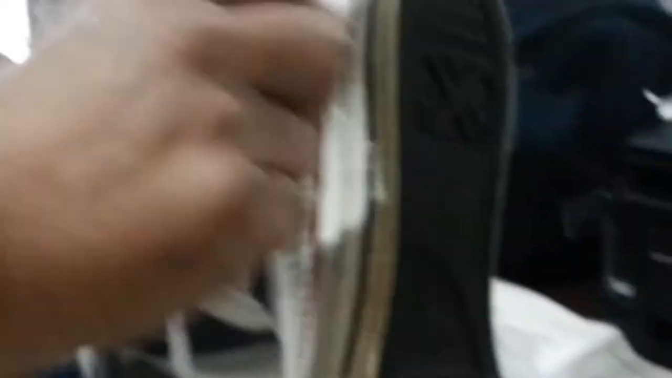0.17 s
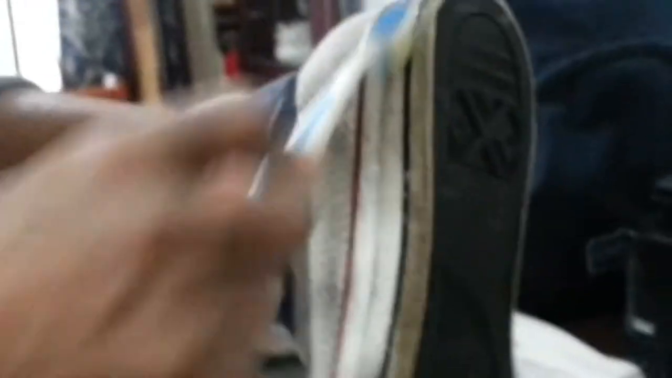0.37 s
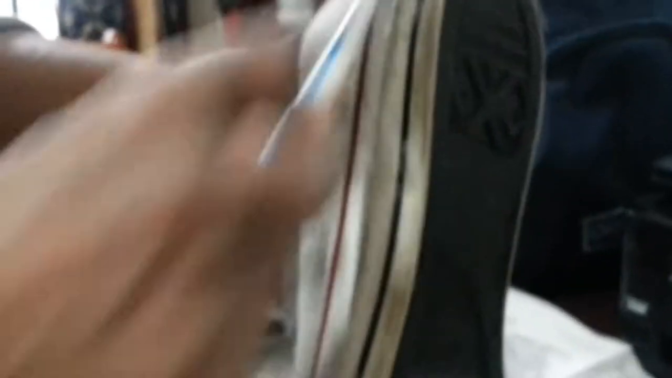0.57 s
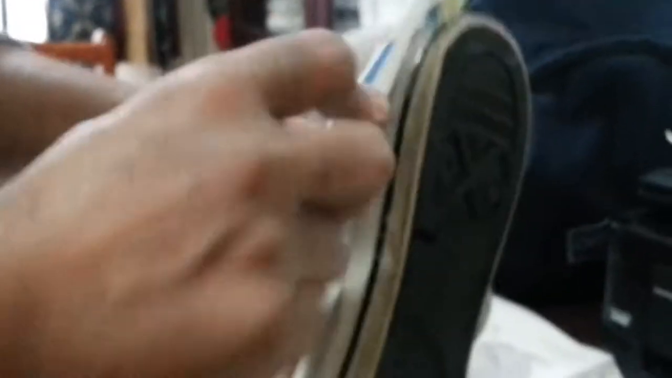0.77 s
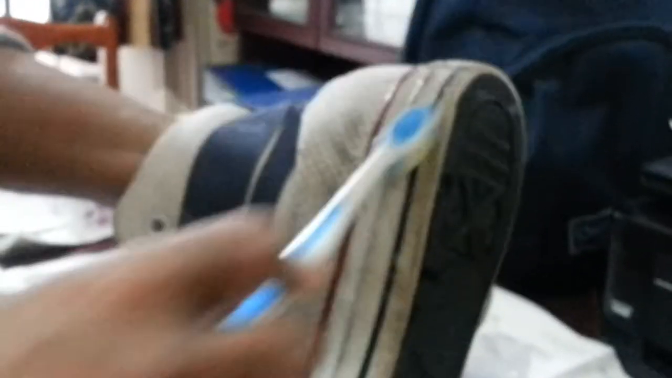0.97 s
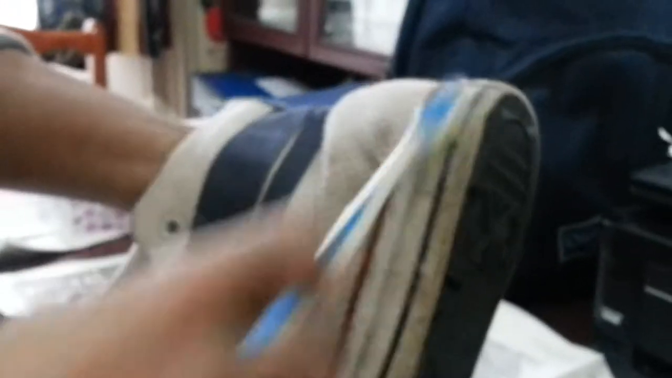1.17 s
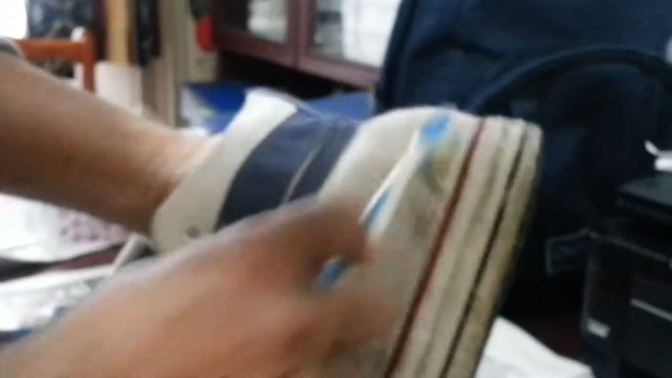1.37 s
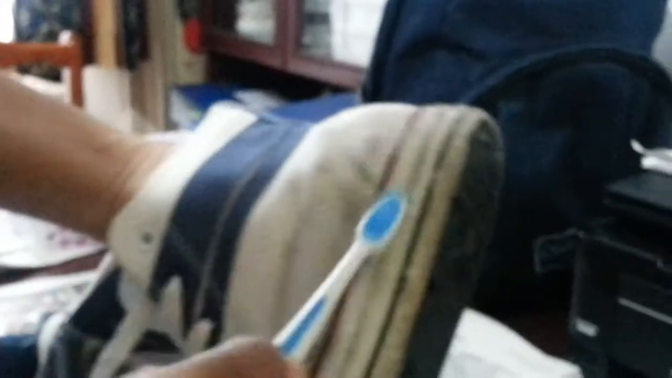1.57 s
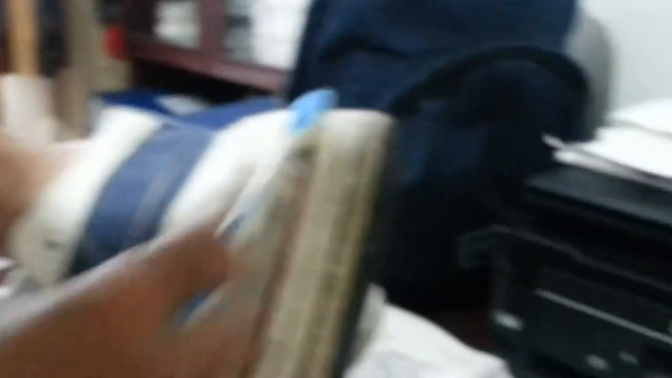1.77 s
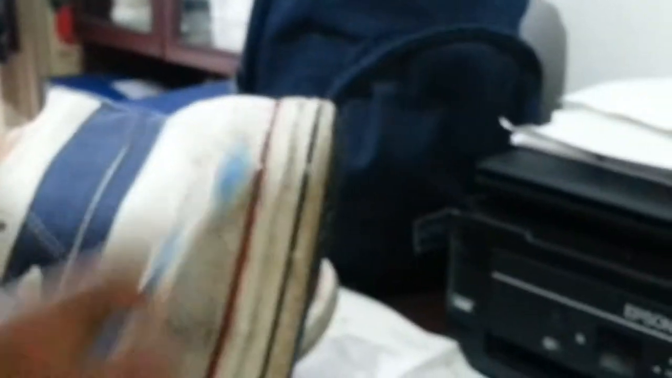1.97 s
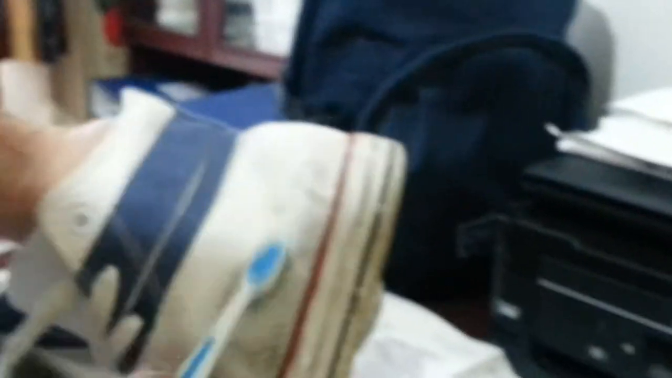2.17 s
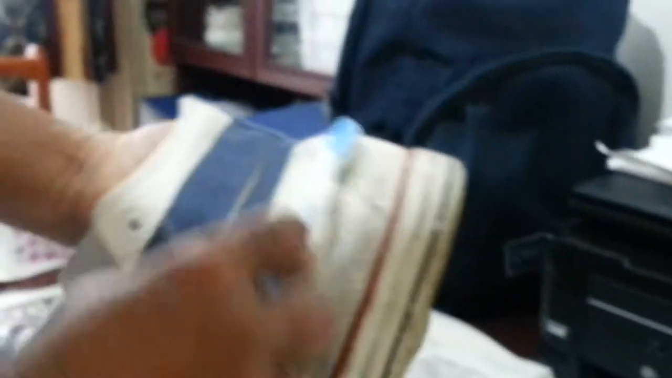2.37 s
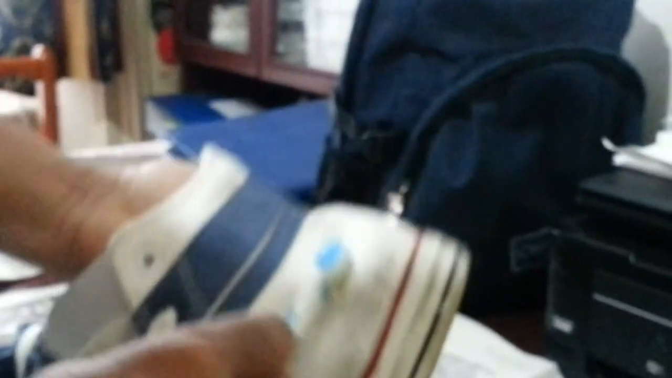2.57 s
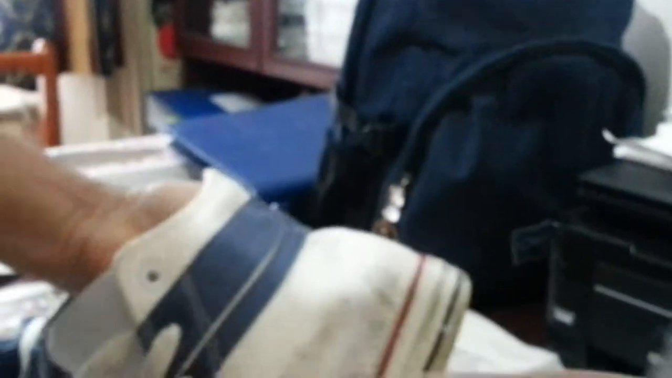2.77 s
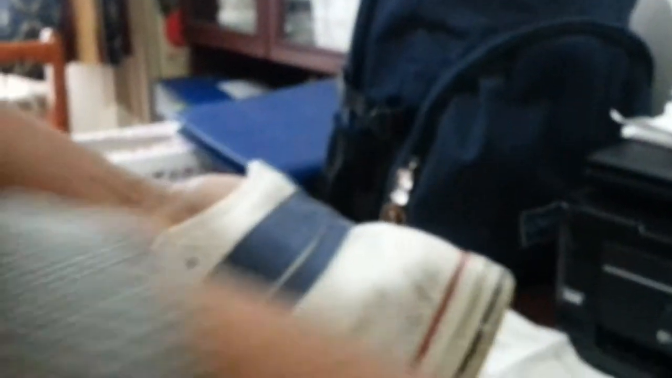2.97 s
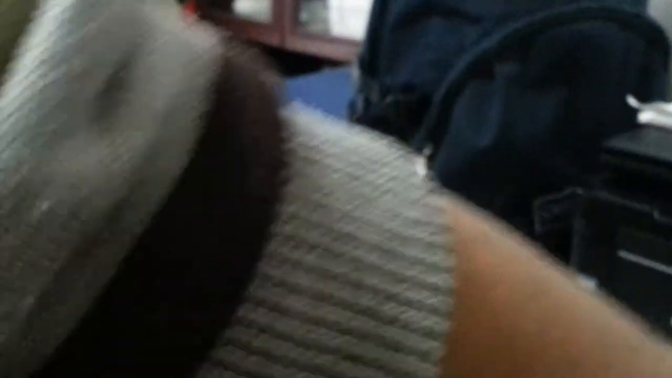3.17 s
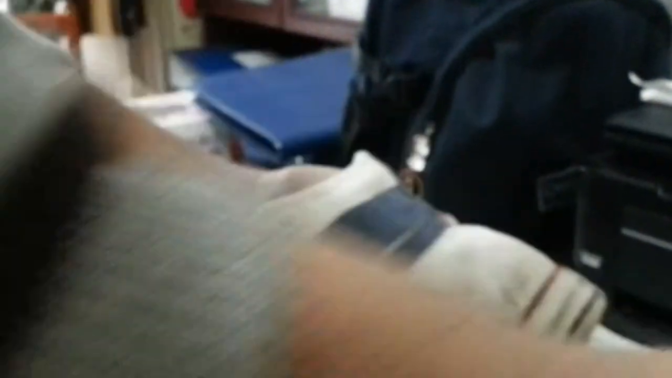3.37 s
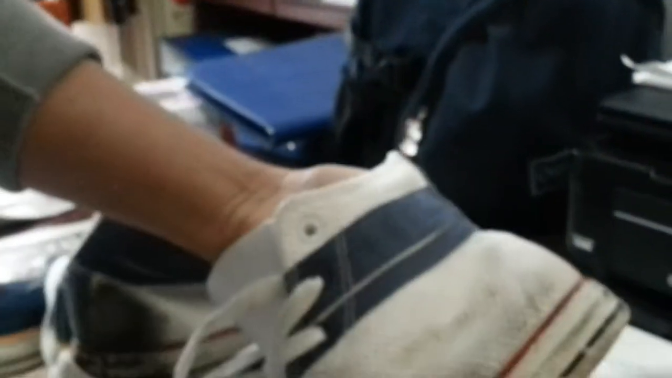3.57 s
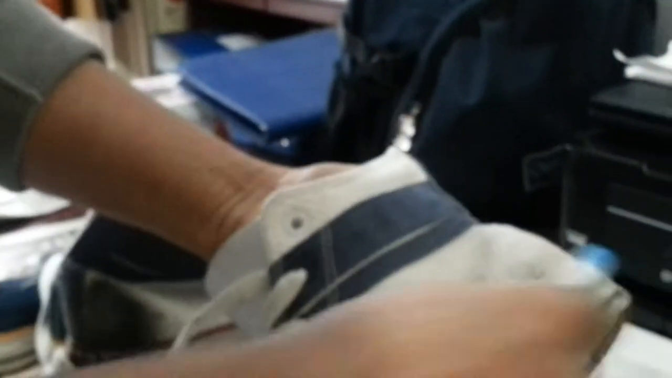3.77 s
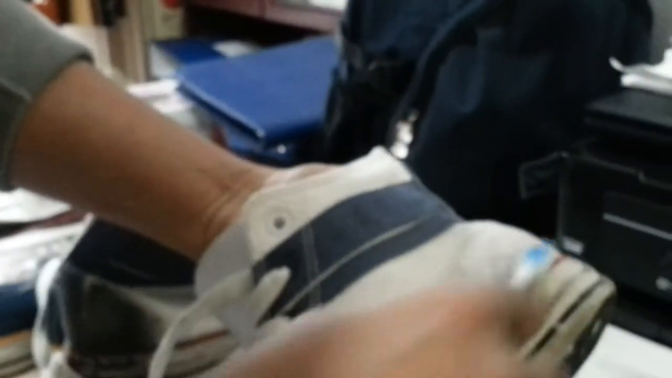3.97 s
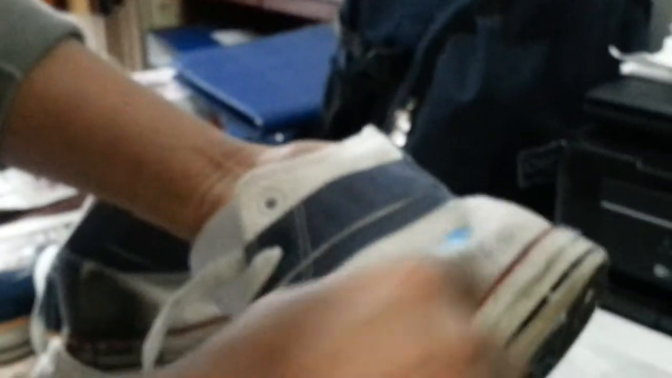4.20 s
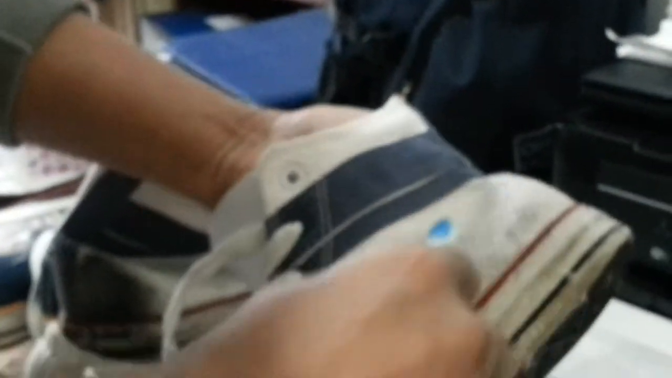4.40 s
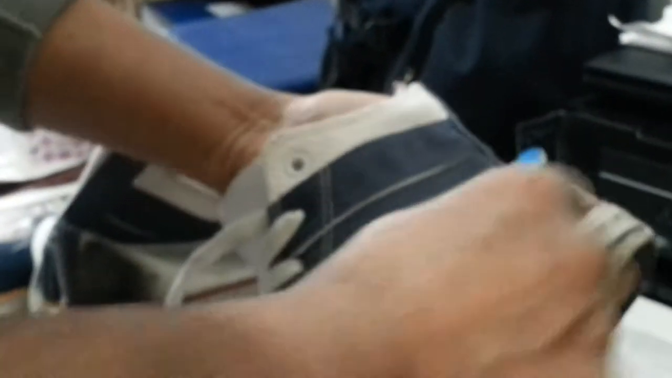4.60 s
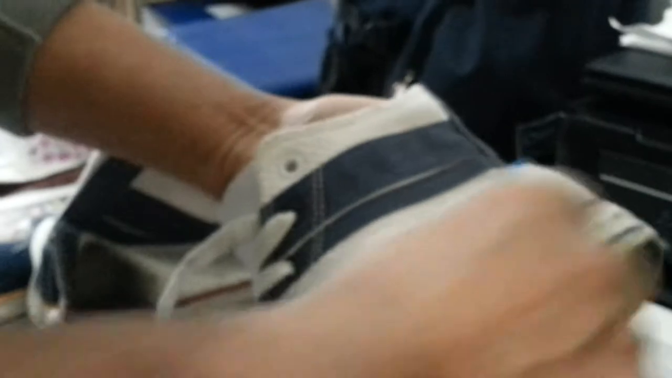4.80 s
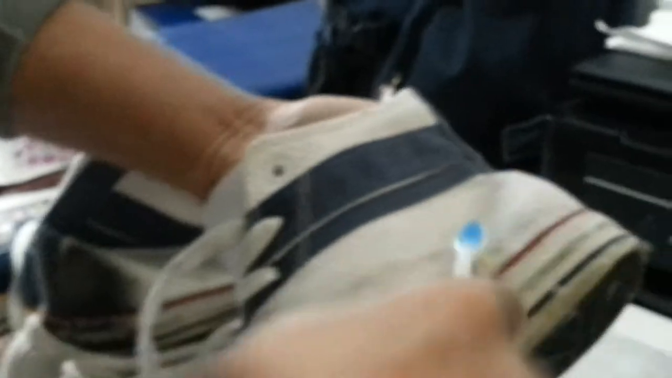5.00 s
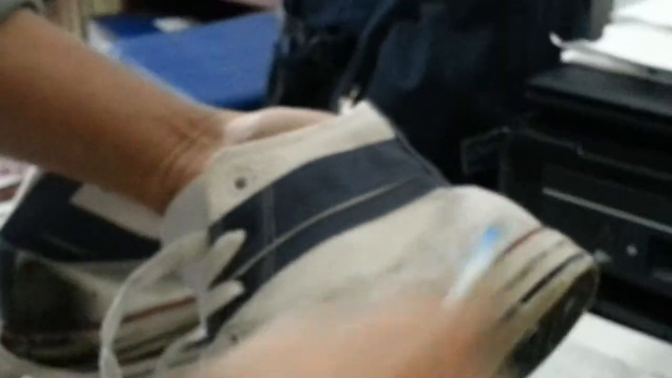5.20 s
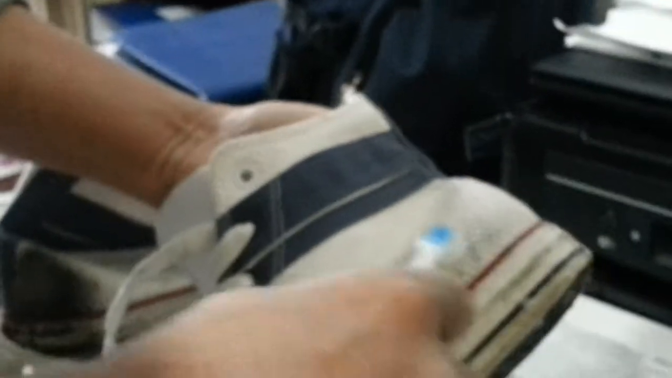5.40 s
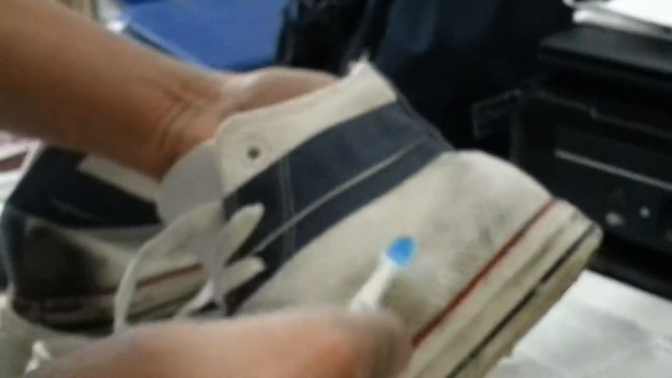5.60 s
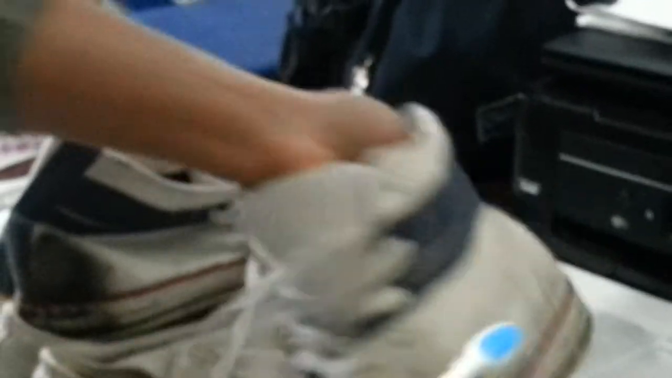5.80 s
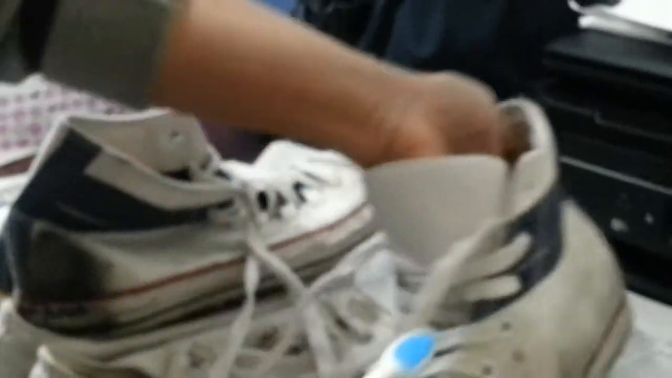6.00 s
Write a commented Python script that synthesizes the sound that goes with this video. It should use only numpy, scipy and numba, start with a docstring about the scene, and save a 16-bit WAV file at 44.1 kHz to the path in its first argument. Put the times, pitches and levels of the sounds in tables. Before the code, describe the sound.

Close stereo phone pickup in a quiet room with faint air, microphone hiss and a short, soft wash from the walls. From 0 seconds a wet toothbrush scrubs a canvas shoe, about six to eight strokes a second, each a swelling bright hiss with foamy fizz; around 0.5 to 1.5 the rubber rim adds a rougher, lower rasp. A dull double table knock comes near 1.0. Strokes peak around 1.5 to 2.2, the loudest near 1.9, with a hollow shoe drone beneath, and stop by 2.7 with a tick and soft knock. From 2.9 to 3.5 cloth rustles, mostly left, with a hard bump and scrape at 3.1 and smaller ones at 3.3. After near quiet, ticks at 3.8 restart brisk, steady scrubbing, with soft thuds at 4.4 and 4.95. A strong stroke falls near 5.3, a sharp click at 5.5, small rattling ticks around 5.7, then weak, rough strokes fade towards 6.

```python
"""A wet toothbrush scrubs a canvas shoe back and forth: thousands of tiny random flicks make the hiss.
The hollow shoe drones along, a low band of the same kind of flicks. The shoe also knocks, scrapes
and slides on the table, cloth rubs, and the brush head ticks on the rim: struck and rubbed resonances.
Filtered noise makes the quiet room. All is heard through a phone's two microphone ports, left and right."""
import sys
import numpy as np
from scipy import signal
from scipy.fft import rfft, irfft
from scipy.io import wavfile
from scipy.ndimage import uniform_filter1d
from numba import njit

SR = 44100
rng = np.random.default_rng(int(sys.argv[2]) if len(sys.argv) > 2 else 0)


def transcribe(signal):
    """Save signal, clipped to [-1, 1], as a 16-bit WAV file at the path in sys.argv[1]."""
    frames = np.atleast_2d(signal).T
    limited = np.clip(frames, -1, 1)
    pcm = np.round(limited * 32767).astype(np.int16)
    wavfile.write(sys.argv[1], SR, pcm)


N = 266805  # length in samples

# brush strokes: full from t/s, rise/s, hold/s, fall/s, base level/dB,
# then relative to the base: shoe drone/dB, foam fizz/dB
BRUSH_STROKES = [(0.0, 0.042, 0.015, 0.088, -32, -16, -9), (0.17, 0.091, 0.02, 0.038, -40.5, -17, -4.5),
                 (0.273, 0.041, 0.022, 0.087, -36, -23.0, -5.5),
                 (0.445, 0.066, 0.029, 0.12, -38.5, -17.5, -6.5),
                 (0.588, 0.042, 0.025, 0.079, -34.5, -21.5, -7), (0.7, 0.026, 0.021, 0.1, -38, -14, -8.5),
                 (0.874, 0.068, 0.018, 0.093, -38, -29, -5), (1.083, 0.098, 0.035, 0.095, -39, -9.0, -10.5),
                 (1.214, 0.059, 0.018, 0.047, -32.5, -22.5, -10),
                 (1.285, 0.049, 0.019, 0.037, -38.5, -9.5, -4.5),
                 (1.364, 0.05, 0.01, 0.14, -34.5, -11.5, -9.5),
                 (1.551, 0.048, 0.02, 0.048, -26.0, -25, -13.5),
                 (1.67, 0.039, 0.02, 0.093, -35.5, -15.5, -8.5),
                 (1.871, 0.049, 0.023, 0.052, -21, -17.5, -15),
                 (2.016, 0.06, 0.015, 0.06, -30.5, -12.5, -13.5),
                 (2.188, 0.057, 0.017, 0.038, -26.5, -9.5, -9.5),
                 (2.293, 0.035, 0.015, 0.019, -32, -10, -10),
                 (2.336, 0.065, 0.018, 0.044, -37.5, -4.5, -7.0),
                 (2.45, 0.042, 0.02, 0.041, -34.5, -8.5, -6.5), (2.56, 0.044, 0.12, 0.022, -38, -11.5, -6),
                 (2.719, 0.037, 0.017, 0.037, -53.7, -7, -6), (3.757, 0.065, 0.026, 0.037, -61, -2.5, -6),
                 (3.812, 0.015, 0.03, 0.04, -41, -12.5, -4), (3.882, 0.03, 0.022, 0.053, -31, -15.5, -12.0),
                 (4.012, 0.082, 0.022, 0.064, -38, -10, -11.5),
                 (4.154, 0.042, 0.019, 0.036, -29, -14, -8.5), (4.272, 0.049, 0.013, 0.053, -40, -1, -10),
                 (4.423, 0.039, 0.015, 0.037, -34, -5.5, -9),
                 (4.549, 0.076, 0.018, 0.062, -36.5, -2.5, -9.5),
                 (4.689, 0.026, 0.02, 0.051, -30.5, -6.5, -8.5),
                 (4.816, 0.041, 0.022, 0.058, -34.5, -3.5, -11.0),
                 (4.981, 0.04, 0.02, 0.048, -29.4, -10, -9.5),
                 (5.104, 0.036, 0.011, 0.057, -37.5, -4.5, -10),
                 (5.272, 0.046, 0.017, 0.065, -25.5, -15.5, -11.5),
                 (5.382, 0.086, 0.033, 0.026, -44, -6, -8), (5.48, 0.036, 0.02, 0.03, -53.5, -6, -7),
                 (5.532, 0.0094, 0.004, 0.0088, -35, -16, -13), (5.571, 0.041, 0.065, 0.058, -32, -9, -11),
                 (5.775, 0.039, 0.026, 0.054, -45, -9.5, -14),
                 (5.85, 0.028, 0.022, 0.032, -44.5, -6, -18.0),
                 (5.943, 0.095, 0.023, 0.095, -49.5, -10.0, -8)]
# cavity behind each microphone port, main resonance first: f/Hz, width/Hz, level/dB
LEFT_CAVITY = [(4770, 820, 9.5), (5900, 820, -20)]
RIGHT_CAVITY = [(6370, 1230, -1), (5190, 3000, -15), (7200, 870, -17.5)]
# where the brush works on the shoe: t/s, left-right tilt/dB (before fixed port gains), rasp change/dB,
# rim level/dB against the base, left ring f/Hz, right ring f/Hz, drone f/Hz
BRUSH_SPOTS = [(0, -3, -0.5, -30, 5130, 7030, 430), (.35, -6, 2, -18.5, 4760, 6750, 454),
               (.55, -6, 3, -12, 4460, 6630, 530), (1.3, -3.5, 2, -14, 4560, 6800, 536),
               (1.8, -1.5, -1, -32.5, 5220, 6540, 420), (2.3, -7.5, 0, -28.5, 4850, 6660, 370),
               (2.6, -5, 4, -15, 4800, 6500, 500), (3.9, -4, 1.5, -28, 4750, 6600, 350),
               (4.5, -4.5, 1, -32, 4630, 6600, 398), (5.0, -5.5, 0.5, -33, 4820, 6930, 420),
               (5.3, -4.5, -2, -30, 4800, 6790, 417), (5.65, -5, 0, -26, 4640, 6750, 430),
               (5.85, 10, 6.5, -25, 4770, 7000, 387), (6.0, 0, 9.5, -5, 4530, 6650, 390)]


def brush():
    """Bristles flick over the weave; each port rings at its own pitch, and foam, rasp, rim and shoe join in."""
    *times, level_db, shoe_db, fizz_db = np.array(BRUSH_STROKES).T
    pan_db, rasp_change_db, rim_db, left_hz, right_hz, drone_hz = curve(BRUSH_SPOTS)
    drag_db = swells(*times, level_db)
    foam_db = swells(*times, level_db + fizz_db)
    # what shakes the shoe also rasps
    rasp_db = rasp_change_db + swells(*times, level_db - 2.5 + 0.62 * shoe_db)
    shoe = drone(swells(*times, level_db + shoe_db), drone_hz)
    return undb(drag_db) * (hiss(pan_db, left_hz, right_hz) + undb(rim_db) * rim()) \
        + undb(foam_db) * foam() + undb(rasp_db) * rasp() + shoe


def hiss(pan_db, left_hz, right_hz):
    """Dense flicks ring the cavity of each port; the brush angle never holds still, so the rings wander."""
    wobble_share, wobble_per_s = 0.031, 7
    rub = echo(rubbing(9000, 0.24))
    left_hz = left_hz * (1 + wobble_share * walk(wobble_per_s))
    right_hz = right_hz * (1 + wobble_share * walk(wobble_per_s))
    left = undb(pan_db / 2 + 5.5) * ring(rub[0], LEFT_CAVITY, left_hz, 2700)
    right = undb(-pan_db / 2 + 1.0) * ring(rub[1], RIGHT_CAVITY, right_hz, 6300)
    return np.array([left, right])


def foam():
    """Foam bursts between the bristles: dense flicks, kept only in the high treble."""
    bursts = rubbing(12000, 0.45)
    bright = body(bursts[0], [(9500, 1200, 0.12), (11200, 2400, -1.1)])
    left = unit(band(bright, 16000, 8000))
    right = unit(band(band(bursts[1], 12000, 6100), 12700, 8200))
    return np.array([left, right])


def rasp():
    """The weave rasps: flicks through broad resonances in the middle pitches."""
    weave = rubbing(7000, 0.39)
    rough = body(weave[0], [(2610, 260, 5.0), (1835, 1540, -1.5)])
    left = unit(band(rough, 1770, 4900))
    right = undb(-2.0) * unit(band(band(weave[1], 2550, 6800), 1500, 3400))
    return np.array([left, right])


def rim():
    """The rubber rim rings: flicks through two resonances and a broad band around them."""
    # rubber rim: f/Hz, width/Hz, level/dB
    rim_peaks = [(675, 157, -2), (1905, 200, -1.5)]
    return unit(band(body(rubbing(3000, 0.7), rim_peaks), 1320, 2500))


def drone(db, hz):
    """Rubbing shakes the hollow shoe, nearly alike at both ports; the drone's main pitch shifts."""
    # hollow shoe: f/Hz, width/Hz, level/dB
    shoe_peaks = [(291, 140, 3.5), (444, 420, -19), (553, 1000, 9.5)]
    low_band = signal.butter(3, [190, 760], "band", fs=SR, output="sos")
    hollow = signal.sosfilt(low_band, body(rubbing(1500, 0.84), shoe_peaks))
    pitched = unit(np.array([svf(v, hz, 350.) for v in hollow]))
    return undb(db + np.array([[0.7], [-0.7]])) * pitched  # left a touch louder


def slide():
    """Sleeve and shoe slide on cloth, with a dull rustle mostly left; scrapes make the shoe drone."""
    # sliding on cloth: t/s, rustle level/dB (before left and right gains), fizz level/dB (likewise)
    cloth_levels = [(2.89, -77, -68.5), (2.935, -52.5, -47), (2.976, -57.5, -52.5), (3.02, -51, -52),
                    (3.05, -48.5, -47), (3.09, -41, -46), (3.15, -42.5, -53.5), (3.3, -46.5, -55.5),
                    (3.37, -50, -55), (3.4, -48.5, -49.5), (3.45, -56.5, -63), (3.47, -71, -65),
                    (3.6, -89, -92)]
    # resonances of the rubbed cloth: f/Hz, width/Hz, level/dB
    cloth_peaks = [(4150, 280, 12), (4700, 280, 5), (2140, 5700, -2)]
    # the shoe scrapes as it is shifted: top t/s, rise/s, fall/s, level/dB, drone f/Hz
    shoe_scrapes = [(2.94, 0.035, 0.091, -61, 475), (3.048, 0.019, 0.026, -41.5, 320),
                    (3.09, 0.013, 0.068, -34, 447), (3.26, 0.054, 0.097, -43, 307),
                    (3.334, 0.017, 0.054, -44.5, 564), (3.45, 0.033, 0.047, -63, 520)]
    rustle_db, fizz_db = curve(cloth_levels)
    coarse, fine = rubbing(6600, 0.69), rubbing(7400, 0.2)

    dull = signal.butter(6, 5200, fs=SR, output="sos")
    rustle = unit(signal.sosfilt(dull, band(body(coarse, cloth_peaks), 2500, 4300)))
    rustle = undb(rustle_db + np.array([[4.5], [-5.5]])) * rustle

    left = undb(-1.0) * unit(body(fine[0], [(5400, 1300, 5), (10070, 6000, -12.5)]))
    right = undb(0.5) * unit(body(fine[1], RIGHT_CAVITY + [(11360, 5000, -30)]))
    fizz = undb(fizz_db) * np.array([left, right])

    top_s, rise_s, fall_s, shoe_db, shoe_hz = np.array(shoe_scrapes).T
    scrape_hz = np.interp(np.arange(N) / SR, top_s, shoe_hz)
    return rustle + fizz + drone(swells(top_s, rise_s, 0, fall_s, shoe_db), scrape_hz)


def table():
    """Soft pushes ring the table top, their hard first touch its highest modes; hands keep it rumbling."""
    # the shoe knocks the table: t/s, push level/dB, softness of contact/ms,
    # then relative to the push: lowest mode/dB, top modes/dB
    shoe_knocks = [(0.964, -46, 2.3, -8, -20), (.983, -24, 1.7, -5, -14), (0.991, -23.5, 1.74, 22.5, -16),
                   (1.088, -35, 0.99, 2, -16), (2.712, -27.5, 2.9, -12, -33), (2.778, -46, 1.9, 1, -20),
                   (3.047, -24.5, 3, -8, -14), (3.082, -16.5, 2.6, -20, -7),
                   (3.087, -16.5, 0.51, -15, -3.5), (3.299, -45, 0.73, -18, -1),
                   (3.328, -46, 0.71, -18, 8.5), (3.335, -55, 0.57, -18, -10), (4.414, -25.5, 2.2, -6, -20),
                   (4.948, -29, 2.4, -5, -20), (5.749, -41.5, 0.83, -15, -30)]
    # ringing modes of the table top: f/Hz, level/dB, time to fade by 60 dB/s
    table_modes = [(105, -11, 0.048), (153.8, -5.5, 0.099), (227.5, -4, 0.036), (316, -7.5, 0.069),
                   (430, 1.5, 0.045), (509, -5.5, 0.097), (596, -12, 0.13), (1720, -12.5, 0.083),
                   (3120, -19.5, 0.22), (5400, -9, 0.0085)]
    # hands shove the shoe against the table: top t/s, fall/s, level/dB, lowest mode/dB relative to it
    hand_shoves = [(1.0, 0.049, -35.5, -5), (1.11, 0.081, -47, 4), (1.41, 0.11, -51, -6),
                   (1.55, .08, -54, 2), (2.33, 0.083, -51, 0), (2.51, .08, -54.5, -16),
                   (2.729, 0.059, -49.5, -15), (3.084, 0.1, -37, -21), (3.26, 0.11, -50, -20),
                   (3.9, 0.16, -52, -4), (4.03, 0.035, -52, -4), (4.43, 0.093, -45.5, -3),
                   (4.84, 0.044, -48, -10), (4.97, .07, -50, -4.5), (5.11, 0.055, -53, 0),
                   (5.36, 0.068, -58, 0), (5.57, 0.13, -55, -12), (5.88, 0.051, -59, 3),
                   (6.05, .05, -55.5, 6)]
    push = np.zeros((3, N))  # for the lowest mode, the middle modes, the top modes
    for s, db, soft_ms, deep_db, top_db in shoe_knocks:
        k, n = int(s * SR), max(int(soft_ms * SR / 1000), 4)
        push[:2, k:k + n] += undb(db + np.array([[deep_db], [0]])) * np.hanning(n) / n
        push[2, k] += undb(db + top_db)
    lowest, middle, top = table_modes[:1], table_modes[1:7], table_modes[7:]
    knocks = strike(push[0], lowest) + strike(push[1], middle) + strike(push[2], top)

    # the table also hums along with the strokes, less steeply than they change
    *times, level_db = np.array(BRUSH_STROKES).T[:5]
    hum = undb(swells(*times, -47.5 + 0.39 * level_db))
    top_s, fall_s, shove_db, deep_db = np.array(hand_shoves).T
    rise_s = 0.033
    rumble = np.hypot(undb(swells(top_s, rise_s, 0, fall_s, shove_db)), hum)
    deep = np.hypot(undb(swells(top_s, rise_s, 0, fall_s, shove_db + deep_db)), undb(-11) * hum)
    hands = rubbing(500, 0.67)
    deep_rumble = deep * unit(strike(hands, lowest))
    return knocks + deep_rumble + rumble * unit(strike(hands, table_modes[1:3]))


def ticks():
    """The brush head hits the rim: a snap and small rattle ring both ports, a thud in the shoe just after."""
    # ticks: t/s, level/dB (before gain and filters), left-right tilt/dB, thud/dB against the tick (likewise)
    rim_ticks = [(2.683, -33, -7, -28.5), (3.758, -35.5, 10, -16.5), (3.791, -32, 2, -16),
                 (3.8127, -38, -7, -32), (5.2064, -32, -14, -4), (5.4981, -20.5, 7, -12),
                 (5.707, -32, 6, -14), (5.726, -41, 6, -1), (5.764, -31, 5, -20)]
    rattle_fade = np.exp(-np.arange(300) / (0.0013 * SR))
    cracks = undb(-16.5) * rng.standard_normal((len(rim_ticks), 300)) * rattle_fade
    cracks[:, 0] = 1  # the snap itself
    hits = np.zeros((3, N))  # left, right, thud
    for (s, db, pan_db, thud_db), crack in zip(rim_ticks, cracks):
        k = int(s * SR)
        hits[:2, k:k + 300] += undb(db + 17.5 + np.array([[pan_db], [-pan_db]]) / 2) * crack
        hits[2, k + 40] += undb(db + thud_db)
    left = band(body(hits[0], LEFT_CAVITY), 3700, 1900)
    right = band(body(hits[1], RIGHT_CAVITY), 6200, 4000)
    thud = undb(25.0) * band(band(hits[2], 720, 700), 800, 900)
    return np.array([left, right]) + thud


def walls(x):
    """The room returns a faint, fading wash: fading noise, unlike at the two ports, smears the sound."""
    t60_s, wash_db = 0.22, -11.5
    tail = rng.standard_normal((2, SR // 2)) * np.exp(-np.log(1000) * np.arange(SR // 2) / (t60_s * SR))
    tail /= np.sqrt(np.sum(tail ** 2, axis=1, keepdims=True))
    return undb(wash_db) * signal.fftconvolve(band(x, 3300, 7000), tail, axes=1)[:, :N]


def room():
    """Quiet air and microphone hiss: noise shaped by pitch, most alike left and right in the bass."""
    # tone colour of the quiet room: f/Hz, relative level/dB
    room_colour = [(24, -40), (40, -9), (65, -10.5), (102, 3), (214, -4.5), (267, -6), (406, -10),
                   (483, -6), (520, -8.5), (716, -7), (963, -15.5), (4780, -16.5), (14500, -19)]
    hz = np.maximum(np.arange(N // 2 + 1) * SR / N, 1)
    colour_hz, colour_db = np.array(room_colour).T
    gain = undb(np.interp(np.log(hz), np.log(colour_hz), colour_db))
    mid, side = rfft(rng.standard_normal((2, N)))
    both = mid + np.clip(hz / 1200, 0.3, 1) * side * np.array([[1], [-1]])
    return undb(-64.5) * unit(irfft(gain * both, N))


def rubbing(rate, shared):
    """Flicks (rate per second) at both ports; the level wanders in patches as the weave passes."""
    three = [flicks(rate, 2) for _ in range(3)]
    return undb(1.5 * walk(120)) * ports(three[0], np.array(three[1:]), shared)


def flicks(rate, scatter_db):
    """Fibres let go at random moments, most weakly, a few harder."""
    hit = rng.random(N) < rate / SR
    return unit(hit * rng.choice([-1., 1.], N) * undb(scatter_db * rng.exponential(size=N)))


def ports(x, other, shared):
    """Both ports hear part alike, the left a little late; the rest arrives by different paths."""
    lag_s = 0.00009
    late = np.interp(np.arange(N) - lag_s * SR, np.arange(N), x)
    return np.sqrt(shared) * np.array([unit(late), x]) + np.sqrt(1 - shared) * other


def echo(x):
    """A few early reflections off hand, shoe and table, by other paths to each port."""
    last_ms, echo_db = 9, -13
    lags = (rng.uniform(0.1, 1, (2, 5)) * last_ms * SR / 1000).astype(int)
    return np.array([v + undb(echo_db) * sum(np.roll(v, lag) for lag in row) for v, row in zip(x, lags)])


def ring(x, port, hz, skirt_hz):
    """A port's resonances; the main one moves a little with the angle of the brush."""
    (centre, width, db), *others = port
    rings = undb(db) * svf(x, hz, 1. * width) + body(x, others)
    return unit(band(rings, centre, skirt_hz))


def strike(x, modes):
    """A struck thing rings in several modes, each a sine that dies away."""
    out = 0
    for hz, db, t60 in modes:
        pole = np.exp(2j * np.pi * hz / SR - np.log(1000) / (t60 * SR))
        out = out + undb(db) * signal.lfilter([1], [1, -pole], x).imag
    return out


def body(x, peaks):
    """A hollow or flexible thing favours several pitches: a sum of resonances."""
    return sum(undb(db) * band(x, hz, width) for hz, db, width in [(f, d, w) for f, w, d in peaks])


def band(x, hz, width_hz):
    """One resonance, gain 1 at the centre."""
    return signal.lfilter(*signal.iirpeak(hz, hz / width_hz, SR), x)


@njit
def svf(x, hz, width):
    """One resonance whose centre moves (state-variable filter), gain 1 at the centre."""
    y, b, l = np.empty(len(x)), 0., 0.  # output, band-pass state, low-pass state
    for i in range(len(x)):
        g, k = np.tan(np.pi * hz[i] / SR), width / hz[i]
        v = (b + g * (x[i] - l)) / (1 + g * (g + k))
        b, l, y[i] = 2 * v - b, l + 2 * g * v, k * v
    return y


def swells(top_s, rise_s, hold_s, fall_s, db):
    """Level in dB of swells that rise, hold and fall like a bell, adding up in power."""
    edge_db = 12  # drop one rise before the top, or one fall after the hold
    grid = np.arange(0, N + 64, 64)
    since = grid[:, None] / SR - top_s
    outside = np.maximum(-since / rise_s, 0) + np.maximum((since - hold_s) / fall_s, 0)
    power = np.sum(undb(2 * (db - edge_db * outside ** 2)), axis=1)
    return np.interp(np.arange(N), grid, 10 * np.log10(power + 1e-12))


def curve(points):
    """Columns of a table at every sample, corners rounded; the first column is the time."""
    s, *columns = np.array(points).T
    return uniform_filter1d([np.interp(np.arange(N) / SR, s, c) for c in columns], size=200, axis=1)


def walk(rate):
    """A slow random wander: a new value rate times a second, joined smoothly, spread near 1."""
    k = int(SR / rate)
    return 1.28 * uniform_filter1d(np.repeat(rng.standard_normal(N // k + 1), k), k)[:N]


def undb(db):
    """Decibels to a plain gain."""
    return 10 ** (np.asarray(db) / 20)


def unit(x):
    """Scale to an RMS level of 1."""
    return x / np.sqrt(np.mean(x ** 2))


def scene():
    """Everything close by, its wash from the walls, and the quiet room."""
    near = brush() + slide() + table() + ticks()
    return near + walls(near) + room()


def record(dry):
    """The phone thins the bass, dips below the left port's ring and cuts the top."""
    thin = signal.sosfilt(signal.butter(5, 60, "high", fs=SR, output="sos"), dry)
    thin[0] -= 0.32 * band(thin[0], 3060, 260)  # the dip, left only
    soft = signal.sosfilt(signal.butter(4, 14000, fs=SR, output="sos"), thin)
    return signal.sosfilt(signal.ellip(12, 0.2, 90, 14650, fs=SR, output="sos"), soft)  # steep cut


dry = scene()
out = record(dry)
transcribe(out)
```